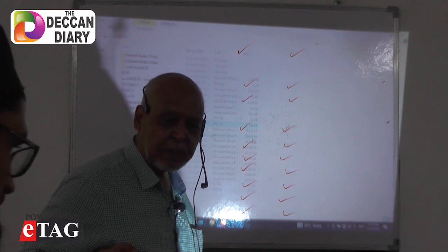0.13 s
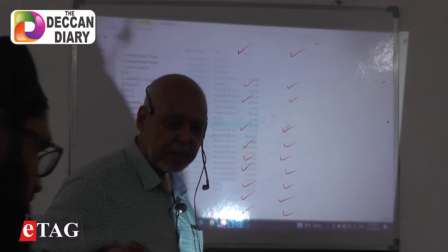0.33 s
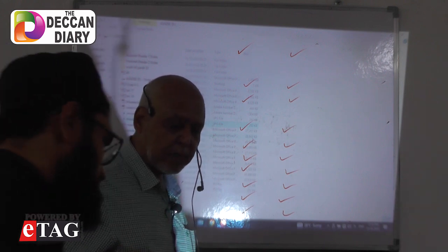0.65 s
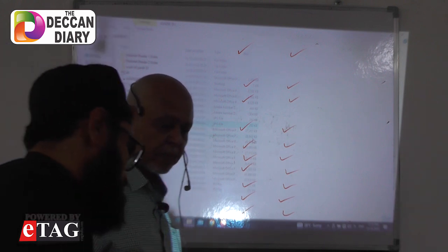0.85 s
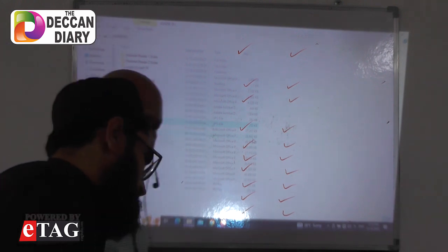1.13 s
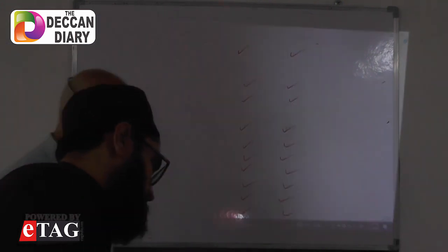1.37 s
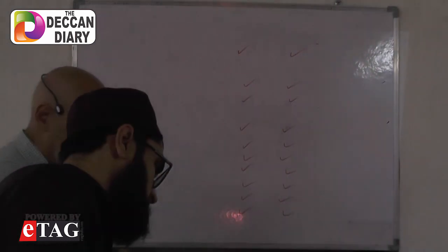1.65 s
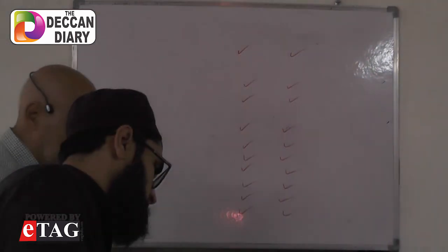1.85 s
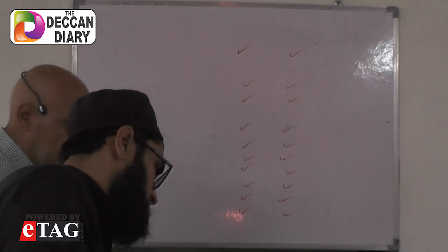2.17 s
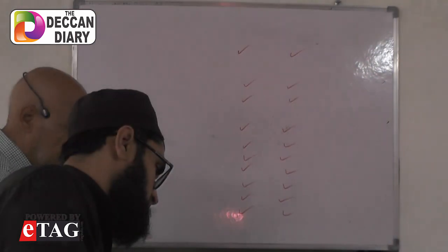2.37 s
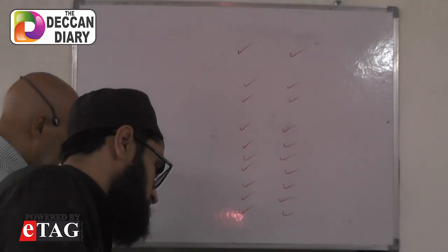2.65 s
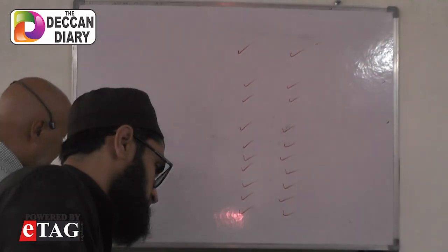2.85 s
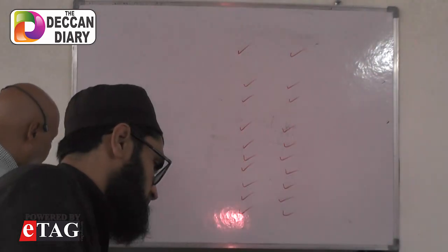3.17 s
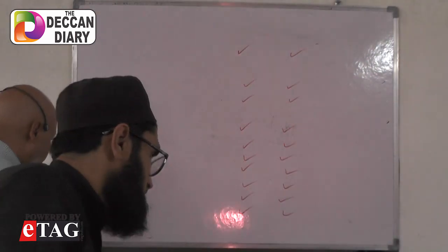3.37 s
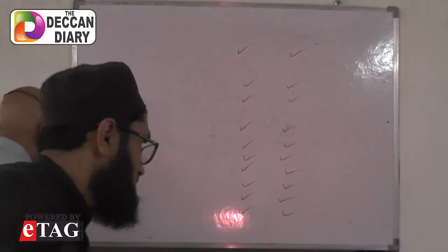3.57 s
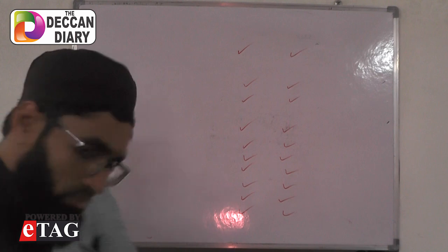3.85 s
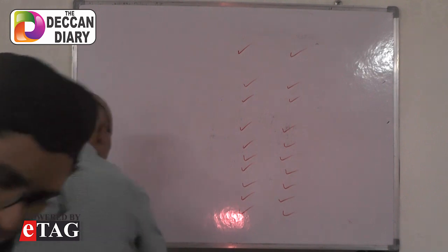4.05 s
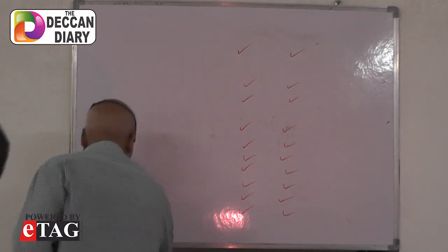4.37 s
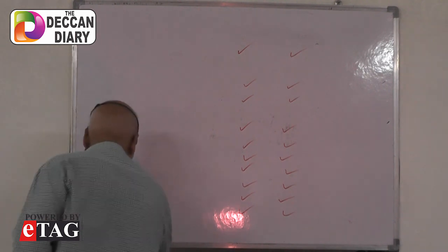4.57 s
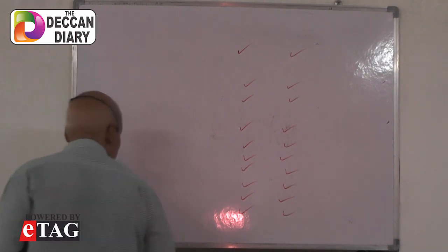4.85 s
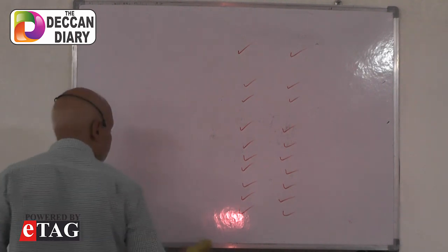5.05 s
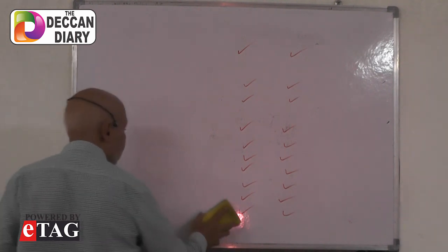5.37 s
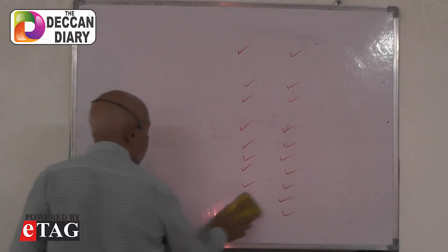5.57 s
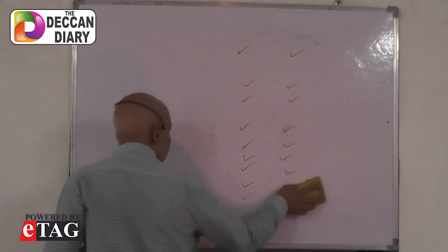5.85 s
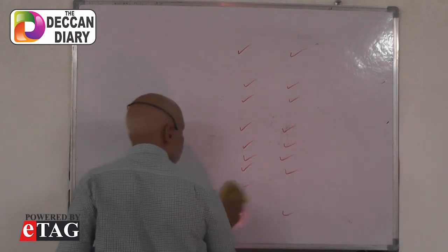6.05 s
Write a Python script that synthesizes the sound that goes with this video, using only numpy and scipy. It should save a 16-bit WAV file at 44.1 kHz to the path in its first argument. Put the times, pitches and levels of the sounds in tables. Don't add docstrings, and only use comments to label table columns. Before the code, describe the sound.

Strong steady mains hum in a quiet classroom, broken by blunt clipped pops and thuds as a microphone lead gets knocked, with the hum dipping after each.

```python
import sys
import numpy as np
from scipy import signal
from scipy.io import wavfile
from scipy.ndimage import uniform_filter1d

SR = 44100
rng = np.random.default_rng(int(sys.argv[2]) if len(sys.argv) > 2 else 0)


def store_pcm(level_fs):
    pcm = np.round(np.clip(level_fs, -1, 1) * 32767).astype(np.int16)
    wavfile.write(sys.argv[1], SR, np.atleast_2d(pcm).T)


def gain_from_decibels(decibels):
    exponent = np.asarray(decibels, float) / 20
    return 10 ** exponent


N = 273861
T = np.arange(N) / SR


def rms_one(x):
    return x / np.sqrt(np.mean(x ** 2) + 1e-20)


def bandpass(x, low_hz, high_hz, order=2):
    return signal.sosfilt(signal.butter(order, [low_hz, high_hz], "band", fs=SR, output="sos"), x)


def drift(rate_hz):
    pole = np.exp(-80 * np.pi * rate_hz / SR)
    draws = rng.standard_normal(N // 40 + 2002)
    slow = signal.lfilter([1], [1, -2 * pole, pole * pole], draws)[2000:]
    return np.interp(np.arange(N) / 40, np.arange(len(slow)), rms_one(slow))


def coloured(spectrum, patchy_db=0.4):
    table_hz, table_db = np.transpose(spectrum)
    edges = 4000 * 2 ** np.arange(-7.5, 2.1, 0.5)
    together = drift(6.0)
    white = rng.standard_normal((2, N))
    out = 0
    for k, (low, high) in enumerate(zip(edges, edges[1:])):
        band = bandpass(white[k % 2], low, high)
        level_db = np.interp(np.log(low * high) / 2, np.log(table_hz), table_db)
        flicker_db = patchy_db * (0.61 * together + drift(10.3))
        out = out + band * gain_from_decibels(level_db + flicker_db)
    return rms_one(out)


# t/s, ceiling level/dB, hold at the ceiling/ms, rise/ms, creep of the ceiling/(1/ms)
KNOCKS = [
    (.0906, -11.2, 4.4, .24, .085),
    (.2705, -10.2, 3.7, .42, .06),
    (2.5477, -12.2, 5.3, .13, -.07),
    (2.648, -13.6, 1.7, .3, .03),
    (2.7096, -16.6, 1.4, .3, .36),
    (3.0624, -9.6, 4.2, .55, .005),
    (3.7453, -10.6, 3.9, .36, .005),
    (4.4895, -11.8, 1.6, .13, .04),
    (4.5056, -12.9, 2.3, .73, .22),
    (5.3505, -12.1, 3.8, .17, -.005),
]
FALL_MS, SAG, SAG_HZ, SAG_MS = 1.34, 0.27, 16.3, 21
CRACKLE_HZ, CRACKLE_MS, CRACKLE_UNDER_CEILING_DB = 1500, 2.6, 41
DUCK_DB, ATTACK_S, RELEASE_S = 11.5, 0.0063, 0.16
DUCK_PER_HOLD_DB, FULL_HOLD_MS = 2.5, 4.07
DUCK_PER_CREEP_DB = 6.5
PILE_UP = 0.3
LINGER_DB, LINGER_S, LINGER_AT_START_DB = 0.63, 1.15, 0.3


def knocks():
    pops, shell = body_pack()
    passed, duck_db = np.ones(N), np.zeros(N)
    grit = rms_one(bandpass(rng.standard_normal(N), CRACKLE_HZ, CRACKLE_HZ * 2, order=1))
    linger_db = LINGER_AT_START_DB * np.exp(-T / LINGER_S)
    for s, ceiling_db, hold_ms, rise_ms, creep in KNOCKS:
        ms = (T - s) * 1000
        after = np.maximum(ms, 0)

        rise = 0.5 * (1 + np.tanh(ms / rise_ms))
        fall = np.exp(-(np.maximum(ms - hold_ms, 0) / FALL_MS) ** (4 / 3))
        pinned = rise * fall
        ceiling = gain_from_decibels(ceiling_db) * (1 + creep * np.minimum(after, hold_ms))

        charge = gain_from_decibels(ceiling_db) * (1 + creep * hold_ms / 2) * hold_ms
        sag = SAG * charge * np.exp(-after / SAG_MS) * np.sin(2 * np.pi * SAG_HZ * after / 1000)
        pops = pinned * ceiling + (1 - pinned) * (pops - sag)
        crackle = grit * (ms > -rise_ms) * np.exp(-after / CRACKLE_MS)
        pops += gain_from_decibels(ceiling_db - CRACKLE_UNDER_CEILING_DB) * crackle
        passed *= 1 - pinned

        since = after / 1000
        longer_db = DUCK_PER_HOLD_DB * np.log2(hold_ms / FULL_HOLD_MS)
        depth_db = DUCK_DB + longer_db - DUCK_PER_CREEP_DB * creep * hold_ms
        grip = 1 - np.exp(-since / ATTACK_S)
        squeeze = grip * np.exp(-since / RELEASE_S)
        carried_db = PILE_UP * duck_db[round(s * SR)]
        duck_db = np.maximum(duck_db, squeeze * depth_db) + squeeze * carried_db
        linger_db += LINGER_DB * grip * np.exp(-since / LINGER_S)
    return pops + shell, passed, duck_db + linger_db


# t/s, thud level/dB, shell ring level/dB
THUDS = [
    (.0906, -14.3, -30),
    (.2705, -16.9, -31),
    (3.0624, -15.6, -22),
    (3.7453, -19.4, -23.5),
    (2.5477, -60, -36),
    (2.7096, -37.7, -38),
    (4.5056, -20.8, -38.5),
    (5.3505, -28, -36),
]
# t/s, level/dB
LEANS = [
    (.0806, -19),
    (.2605, -21),
    (2.5377, -26),
]
THUD_HZ, THUD_MS, SHELL_HZ, SHELL_MS, LEAN_MS = 91, 12.7, 410, 1.57, 8


def body_pack():
    low, shell = np.zeros(N), np.zeros(N)
    for s, thud_db, shell_db in THUDS:
        ms = (T - s) * 1000
        rocking = np.sin(2 * np.pi * THUD_HZ * (ms - 0.4) / 1000)
        low += gain_from_decibels(thud_db) * np.exp(-((ms - 2.3) / THUD_MS) ** 2) * rocking
        ring = np.sin(2 * np.pi * SHELL_HZ * ms / 1000)
        shell += gain_from_decibels(shell_db) * np.exp(-(ms / SHELL_MS) ** 2) * ring
    for s, db in LEANS:
        low += gain_from_decibels(db) * np.exp(-((T - s) * 1000 / LEAN_MS) ** 2)
    return low, shell


# multiple of the mains, level/dB (the fundamental itself is played at 0 dB)
HUM = [(1, 3), (2, -28.5), (3, -15), (4, -32), (5, -23.5), (6, -39), (7, -33), (8, -40.5), (9, -39.5),
       (10, -51.5), (12, -54), (13, -54.5), (17, -43.5), (22, -43.5), (23, -54.5), (27, -58), (35, -53.5)]
MAINS_HZ, MAINS_START = 49.9125, -1.455
BUZZ_DB, BUZZ_AT = -56, -1.73


def hum():
    angle = 2 * np.pi * MAINS_HZ * T + MAINS_START
    wave = np.cos(angle)
    for k, db in HUM[1:]:
        k = round(k)
        if k < 14:
            lag = 1.6 - 0.3 * k + 2 * (k % 2 == 0)
        else:
            lag = rng.uniform(0, 2 * np.pi)
        waver_db = 2.64 * drift(4.8) * (k > 6)
        wave += gain_from_decibels(db + waver_db) * np.cos(k * angle - lag)
    cycle = np.floor((angle - BUZZ_AT) / (2 * np.pi))
    spikes = np.diff(cycle, prepend=0) > 0
    spikes = bandpass(spikes * rng.random(N) + 1e-18, 600, 3500)
    return rms_one(wave) + gain_from_decibels(BUZZ_DB) * rms_one(spikes)


# t/s, level/dB, centre f/Hz, decay/s
BRUSHES = [(.001, -75, 5000, 0.008), (.64, -68, 7900, 0.21), (1.525, -61, 9000, 0.011),
           (1.651, -53, 3340, 0.023), (1.685, -50, 3320, 0.02), (3.28, -56, 8000, .005),
           (3.78, -35, 1200, 0.011), (3.811, -42.5, 1500, 0.024), (3.829, -57, 1790, 0.021),
           (4.1, -31, 31.7, 0.13), (5.012, -58.5, 3680, 0.027), (5.625, -56.5, 6200, 0.034),
           (6.19, -64, 5000, .03), (1.687, -64, 6500, .02), (1.526, -60, 5000, .008)]


def brushes():
    out, t = np.zeros(N), np.arange(SR // 3) / SR
    for s, db, hz, decay in BRUSHES:
        grains = rng.standard_normal(len(t)) * (1 + rng.exponential(1, len(t)))
        puff = rms_one(bandpass(grains, hz / 1.35, hz * 1.35))
        swell = (1 - np.exp(-t / 0.0068)) * np.exp(-t / decay)
        at = round(s * SR)
        out[at:at + len(t)] += (gain_from_decibels(db) * puff * swell)[:N - at]
    return out


# t/s, length/s, f/Hz, level/dB
SQUEAKS = [
    (2.398, 0.096, 1753, -54.5),
    (3.672, 0.036, 1232, -48),
]


def squeaks():
    out = np.zeros(N)
    for s, length, hz, db in SQUEAKS:
        out += gain_from_decibels(db) * np.exp(-((T - s) / length) ** 2) * np.sin(2 * np.pi * hz * T)
    return out


# f/Hz, level/dB per Hz
RUB = [(1500, -7.5), (3000, 17.5), (6000, 1), (10000, -3), (16000, -4.5)]
# t/s, level/dB
MOVEMENT = [(0, -68.5), (.55, -66.5), (.75, -63), (1.2, -64), (2, -69), (3, -68), (3.7, -70.5), (4.4, -69),
            (4.9, -66), (5.3, -68), (5.6, -65.5), (5.9, -67.5), (6.21, -65)]


def rubbing():
    level_db = np.interp(T, *np.transpose(MOVEMENT))
    return gain_from_decibels(level_db) * coloured(RUB)


# f/Hz, level/dB per Hz
AIR = [(25, -14.5), (70, -10), (130, -14.5), (300, -12.5), (700, -16.5), (1100, -18.5), (1700, -26),
       (2400, -31), (3400, -41.5), (4700, -47.5), (6700, -49.5), (9000, -54.5), (16000, -59.5)]
AIR_DB, AIR_FADE_DB, AIR_FADE_AT_S, AIR_FADE_S = -42, 1.5, 2.2, 0.63


def room_air():
    wound_down = 0.5 * (1 + np.tanh((T - AIR_FADE_AT_S) / AIR_FADE_S))
    return gain_from_decibels(AIR_DB - AIR_FADE_DB * wound_down) * coloured(AIR)


def scene():
    pops, passed, duck_db = knocks()
    bed = gain_from_decibels(-17) * hum() + brushes() + squeaks() + rubbing() + room_air()
    return (pops + passed * gain_from_decibels(-duck_db) * bed)[None]


def mute_faint_treble(x):
    above_hz, below_db, band_bins = 12100, -113, 16
    hz, _, z = signal.stft(x, SR, nperseg=2048)
    power = uniform_filter1d(np.abs(z) ** 2, size=band_bins, axis=1)
    centre = np.arange(len(hz)) // band_bins * band_bins + band_bins // 2
    faint = power[:, np.minimum(centre, len(hz) - 1)] < gain_from_decibels(below_db) ** 2
    muted = faint & (hz > above_hz)[:, None]
    return signal.istft(z * ~muted, SR, nperseg=2048)[1][:, :N]


def low_pass(x):
    return signal.sosfilt(signal.butter(12, 16380, fs=SR, output="sos"), x)


def record(dry):
    top_cut = signal.ellip(12, 0.5, 70, 15720, fs=SR, output="sos")
    mix = mute_faint_treble(signal.sosfilt(top_cut, dry))
    return low_pass(mix)


dry = scene()
out = record(dry)
store_pcm(out)
```